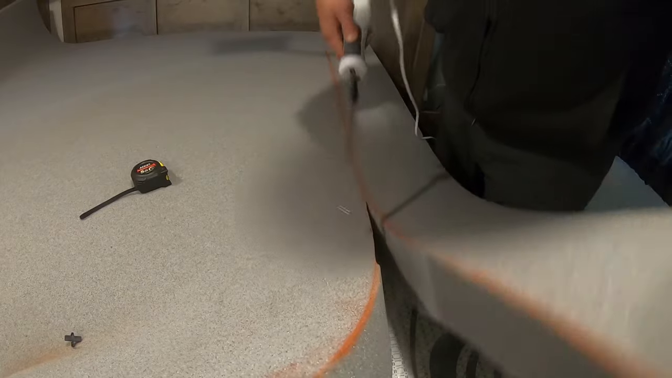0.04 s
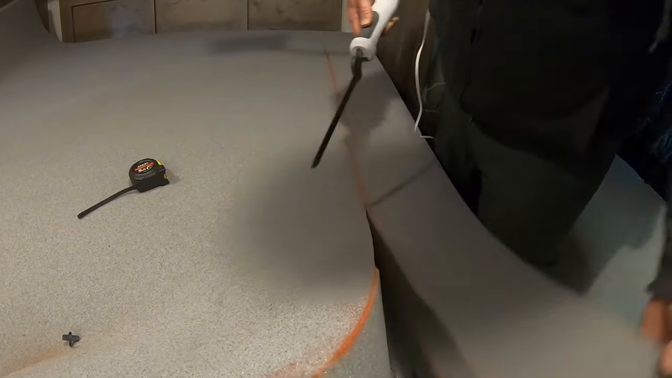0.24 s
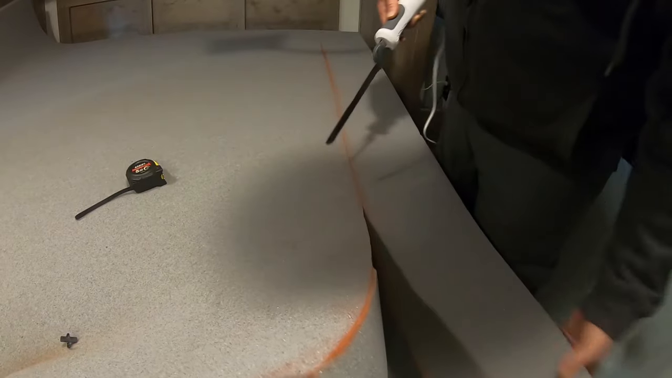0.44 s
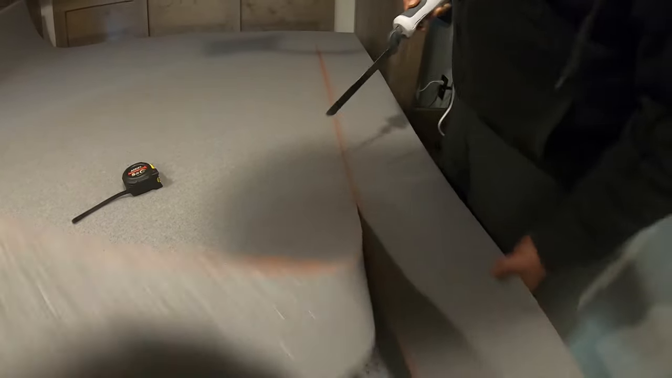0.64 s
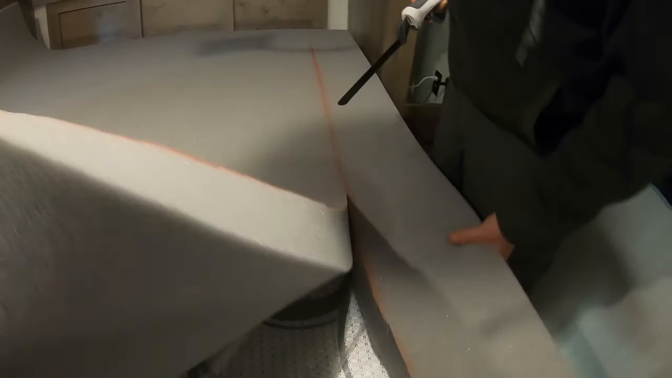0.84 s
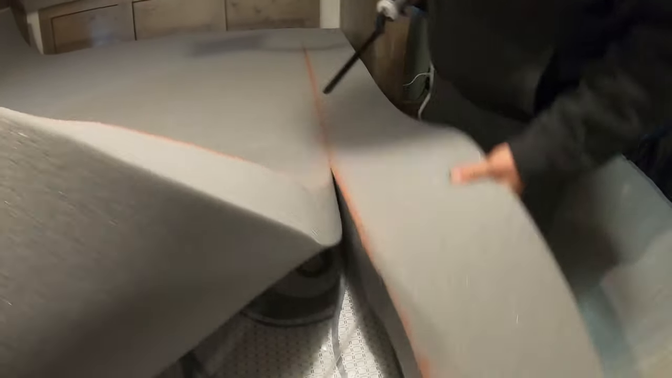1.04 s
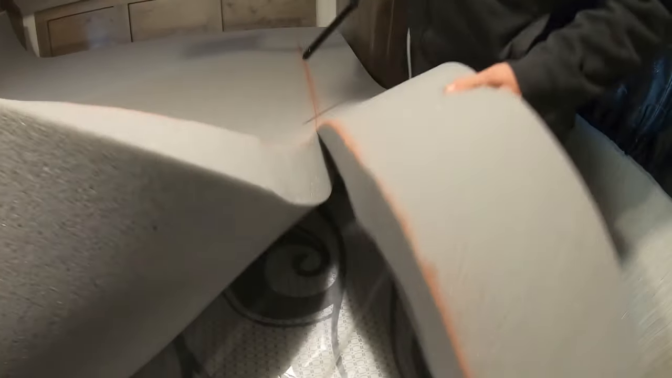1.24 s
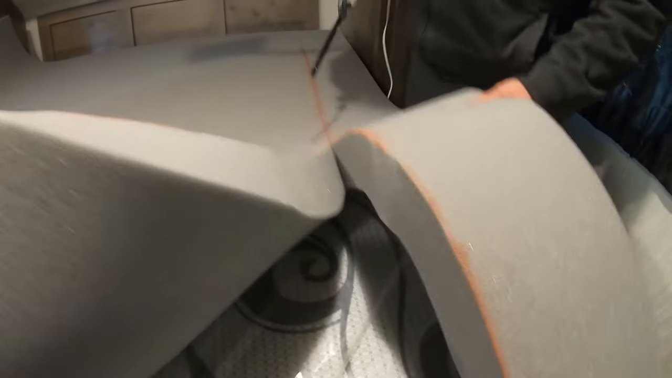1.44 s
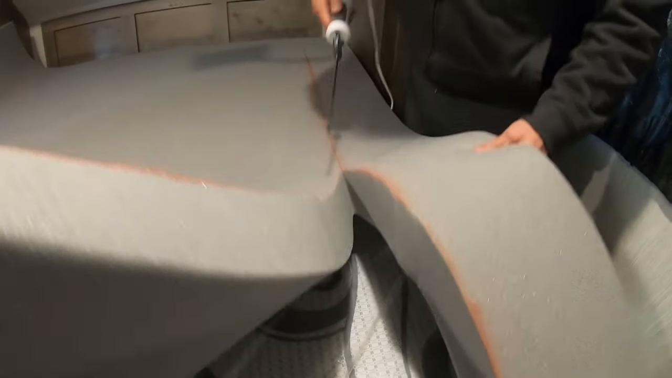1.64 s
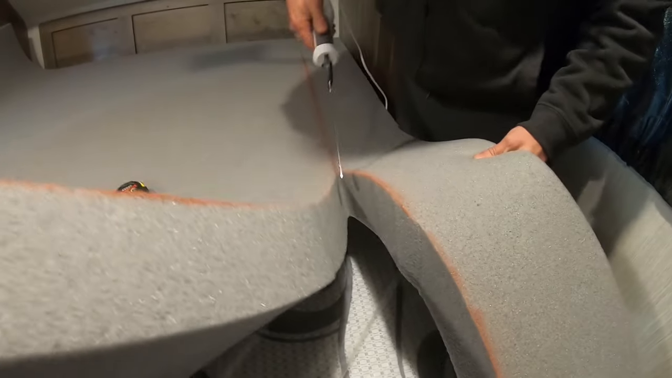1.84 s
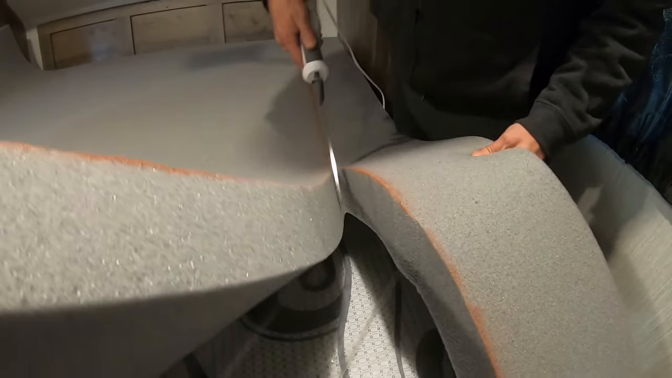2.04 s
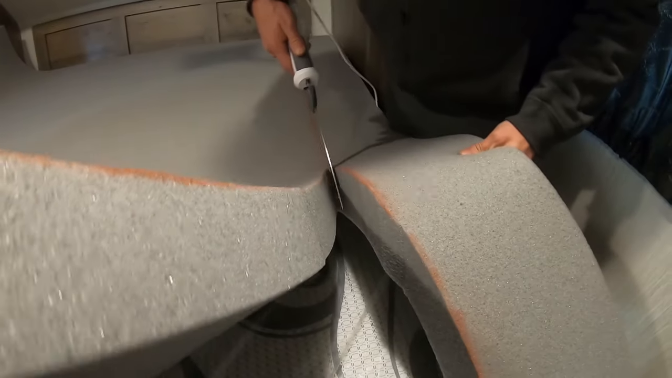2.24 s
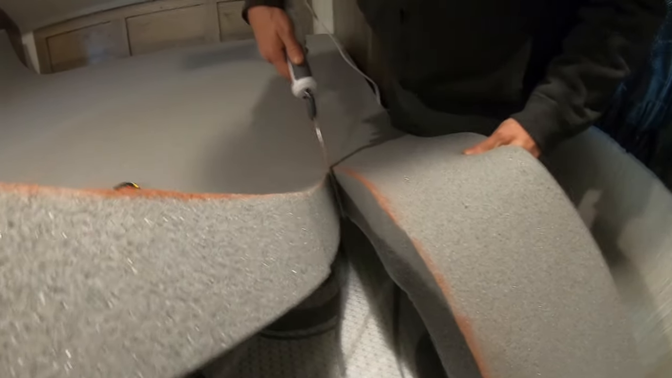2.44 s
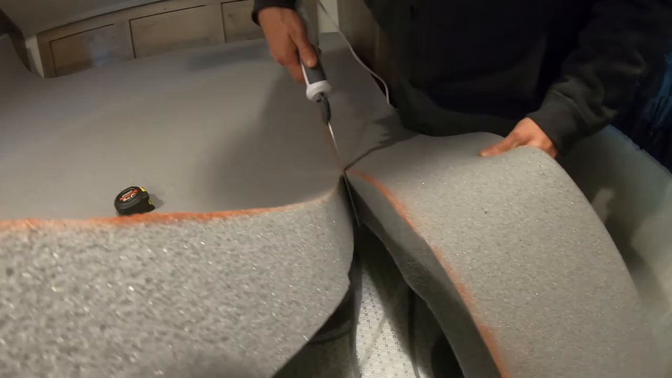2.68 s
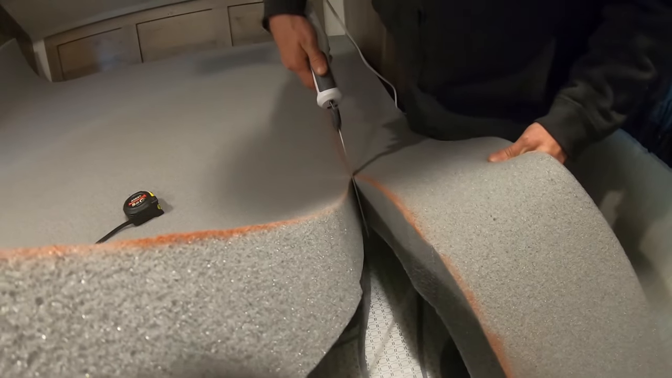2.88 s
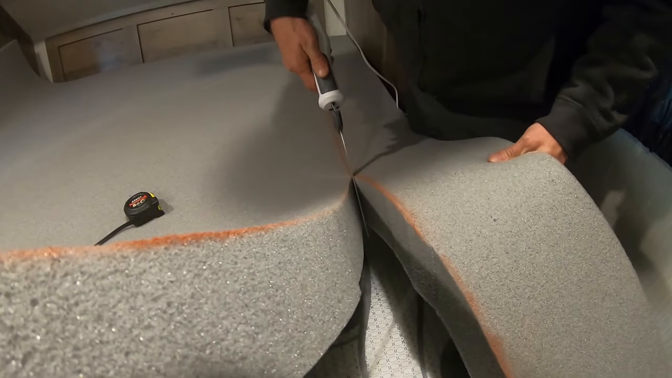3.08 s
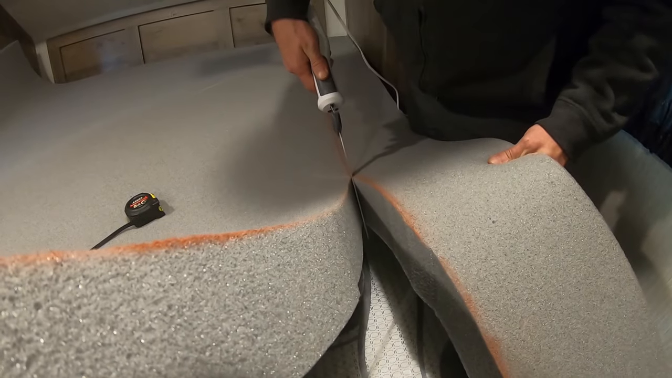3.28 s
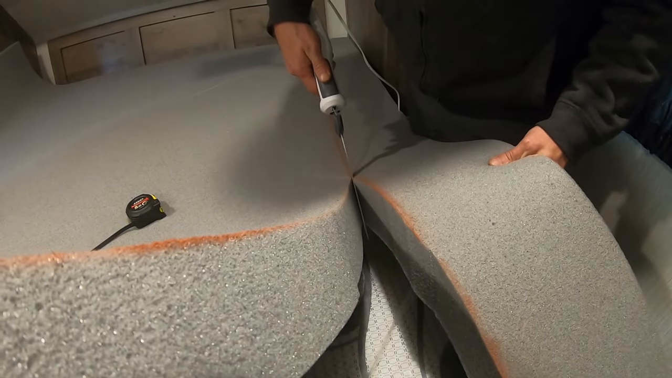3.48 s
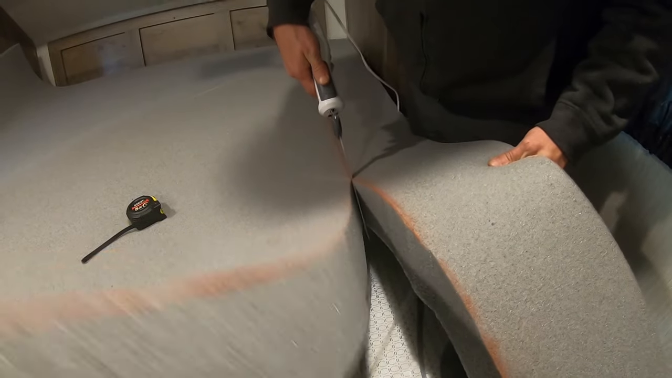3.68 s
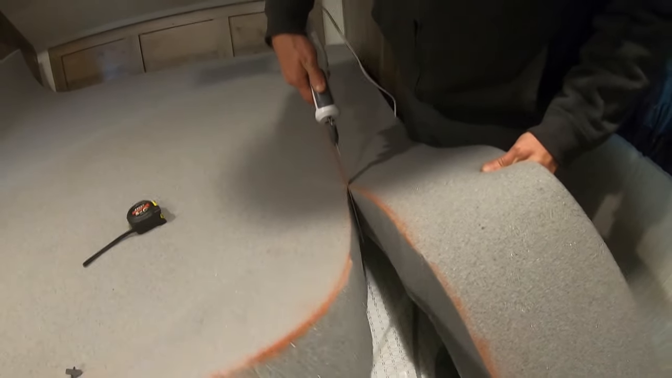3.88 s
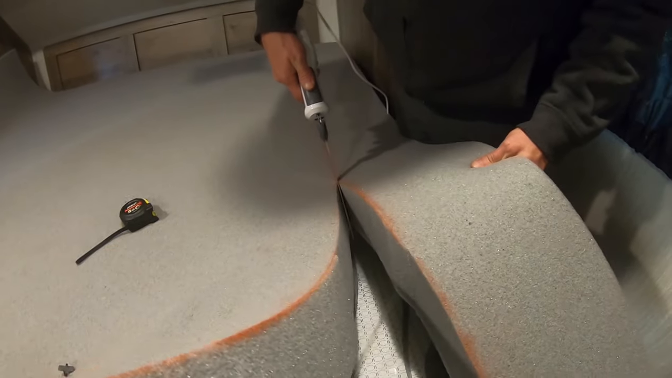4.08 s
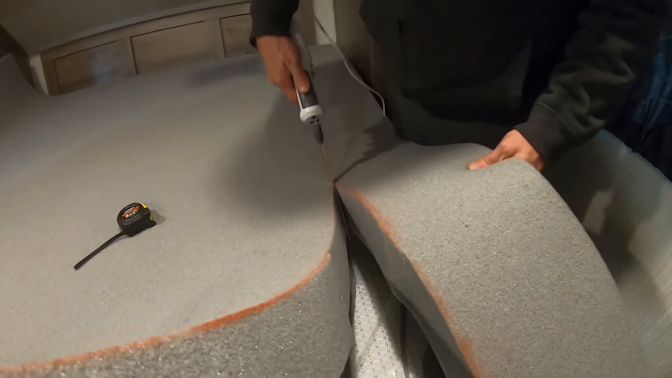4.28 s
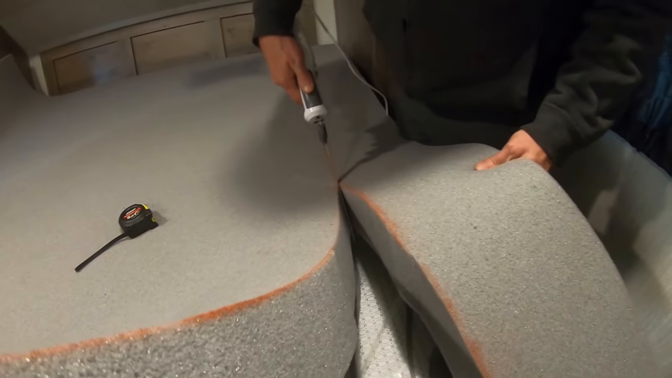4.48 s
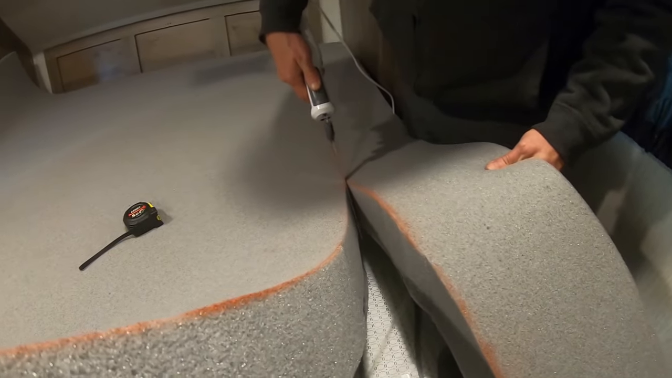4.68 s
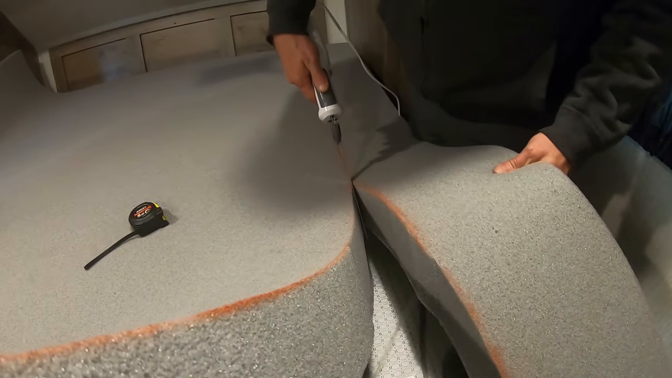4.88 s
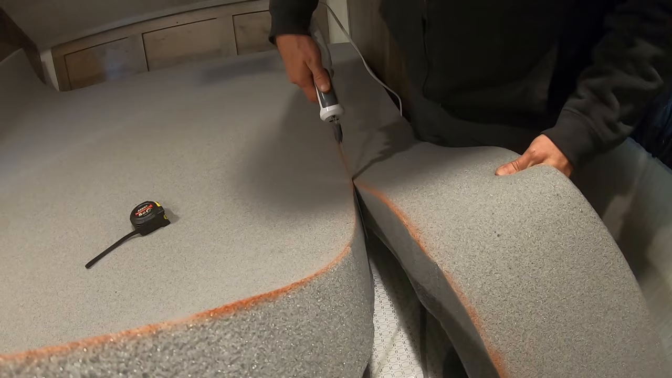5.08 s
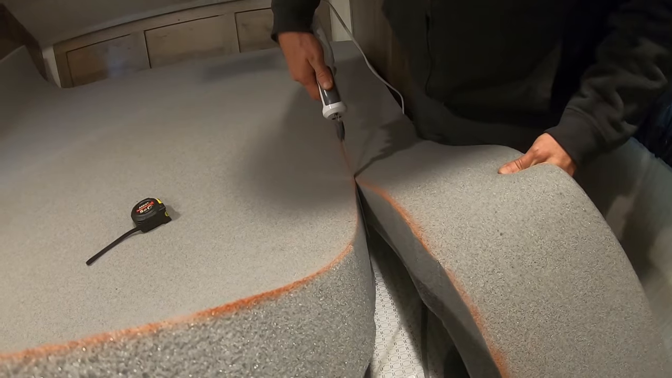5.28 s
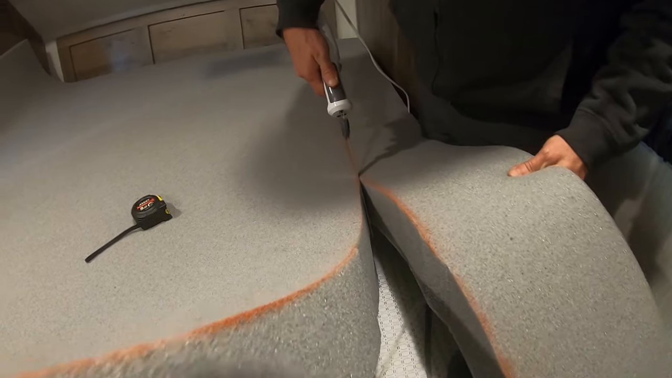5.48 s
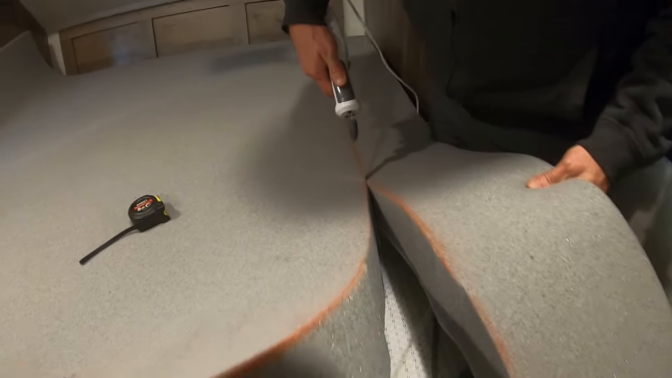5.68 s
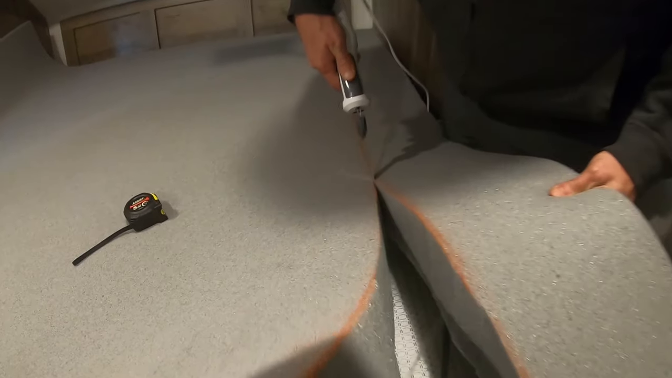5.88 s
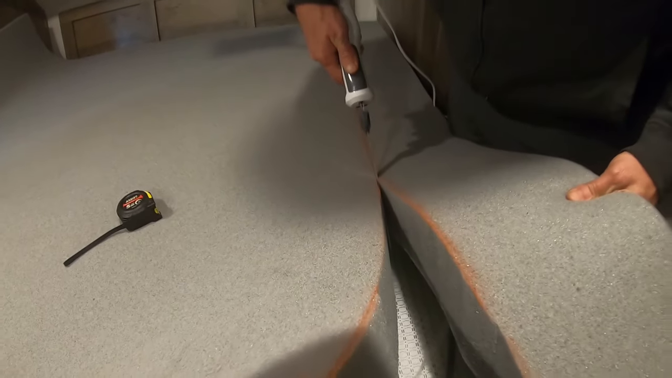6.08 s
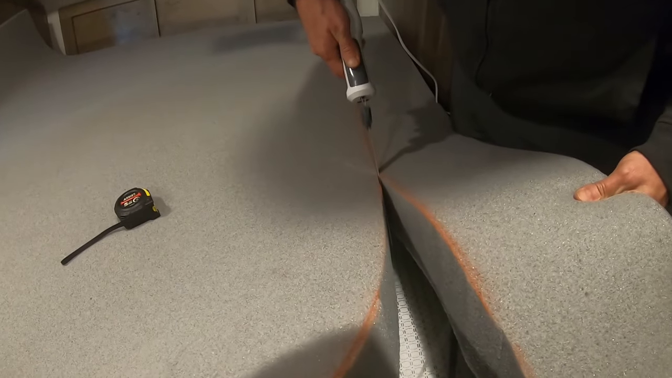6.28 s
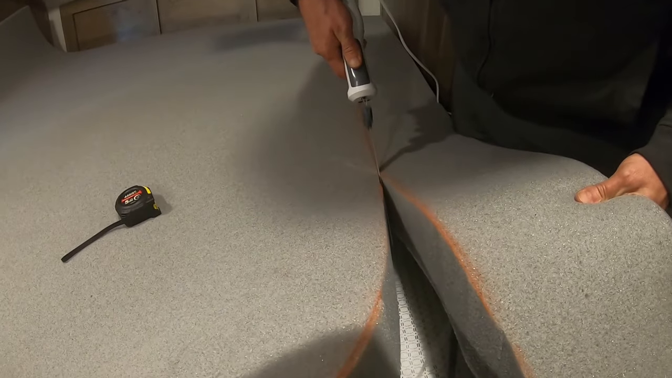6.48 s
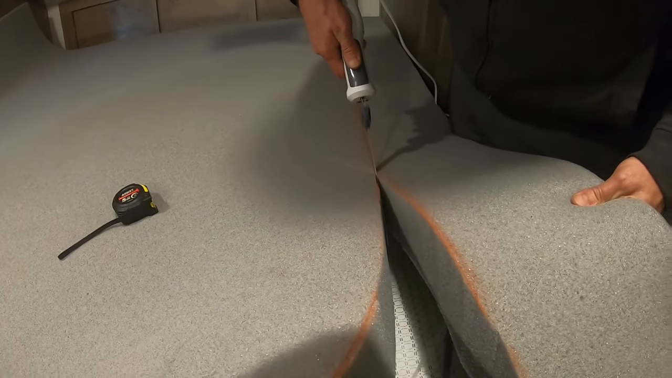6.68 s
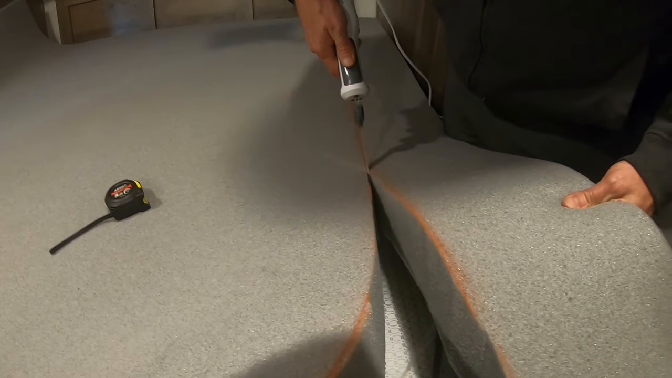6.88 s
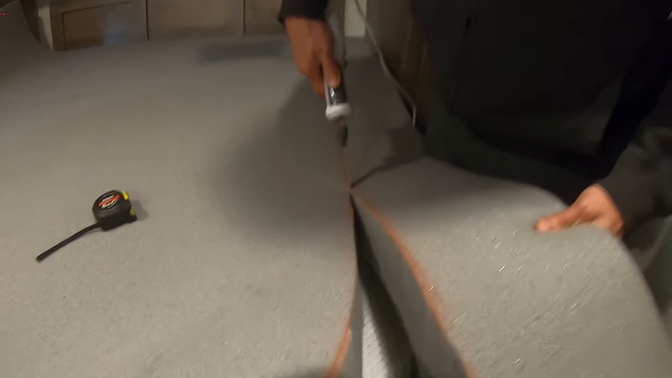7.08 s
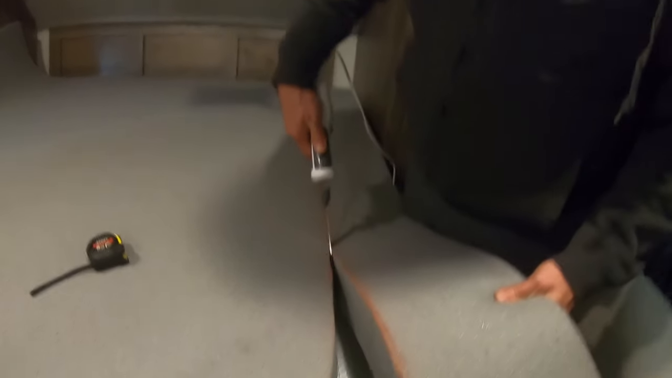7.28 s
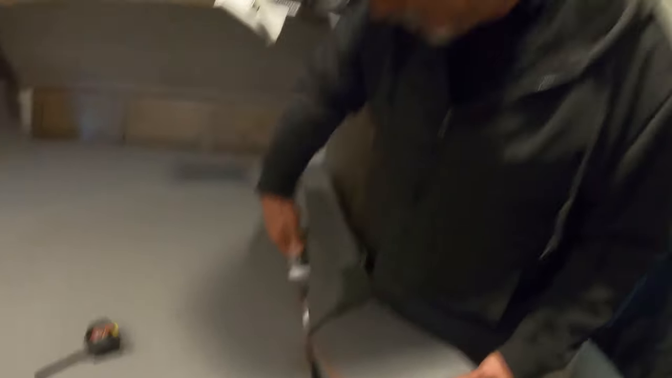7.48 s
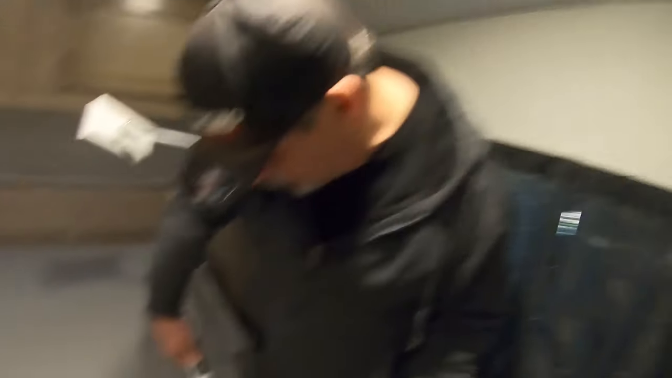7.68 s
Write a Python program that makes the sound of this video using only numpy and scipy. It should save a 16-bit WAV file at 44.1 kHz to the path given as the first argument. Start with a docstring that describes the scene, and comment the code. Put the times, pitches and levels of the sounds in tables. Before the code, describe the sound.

Close in a small, dry trailer, thick foam brushes, catches and slips, with soft hand thuds. Loose knife blades tick lightly as they are set in the cut. A trigger clicks and the electric knife starts almost at once, a loud, gritty, fast-stroking buzz that holds until the end apart from one brief sag. A hand-held phone about a metre away picks up low air bumps.

```python
"""A slab of thick foam is folded back in a small trailer: cells brush in noise scuffs, catch and slip. From 1.2
s the knife's loose blades tick as they are set into the cut: noise cracks with sine rings. At 2.66 s the
trigger clicks and the motor starts: a worm gear drives two blades, 32 strokes a second, as sine lines and
rasping noise. At 6.93 s the trigger slips and the motor sags, then recovers. Thuds of hands and body fall
throughout. A hand-held phone listens from about a metre, swaying slowly in the hand."""
import sys
import numpy as np
from scipy import signal
from scipy.fft import rfft, irfft, next_fast_len
from scipy.io import wavfile

SR = 44100
rng = np.random.default_rng(int(sys.argv[2]) if len(sys.argv) > 2 else 0)


def put_to_file(sound):
    """Save the sound as 16-bit audio at rate SR, in the file named by the first command-line argument."""
    columns = np.atleast_2d(sound).T  # one column per channel
    safe = np.clip(columns, -1, 1)
    whole_steps = np.round(safe * 32767)
    wavfile.write(sys.argv[1], SR, whole_steps.astype(np.int16))


N = 340978
T = np.arange(N) / SR
HZ = np.maximum(np.fft.rfftfreq(2 * next_fast_len(N // 2 + 4096), 1 / SR), 1)


def undb(db):
    """Decibels to gain."""
    return 10 ** (np.asarray(db) / 20)


def curves(table):
    """The columns of a table, joined by lines in time."""
    s, *columns = np.transpose(table)
    return [np.interp(T, s, c) for c in columns]


def slope(points, hz=HZ):
    """A spectrum in dB, joined by lines over log frequency."""
    f, db = np.transpose(points)
    return np.interp(np.log(hz), np.log(f), db)


def tilt(db_per_octave):
    """A treble tilt in dB that starts at 400 Hz; its overall level is left to the caller."""
    return db_per_octave * np.log2(np.maximum(HZ, 400))


def colour(x, db):
    """Causal minimum-phase filter with the given gain at each frequency."""
    cepstrum = irfft(np.log(undb(db)))
    size = len(cepstrum)
    cepstrum[1:size // 2] *= 2
    cepstrum[size // 2 + 1:] = 0
    return irfft(rfft(x, size) * np.exp(rfft(cepstrum)))[:N]


def band(x, lo_hz, hi_hz):
    """The part of a sound between two frequencies."""
    spectrum = rfft(x, 2 * len(HZ) - 2)
    return irfft(spectrum / (1 + (lo_hz / HZ) ** 8) / (1 + (HZ / hi_hz) ** 8))[:N]


def unit(x):
    """Scale to rms 1."""
    return x / np.sqrt(np.mean(x ** 2))


def walk(rate_hz):
    """Random wander from 0.3 Hz up to the rate, with a spread of 1."""
    return unit(band(rng.standard_normal(N), .3, rate_hz))


def grit(spread_db, size=N):
    """Noise made of tiny contacts, 8 samples each, of very unequal strength."""
    strength = np.repeat(rng.standard_normal(size // 8 + 1), 8)[:size]
    return unit(rng.standard_normal(size) * undb(spread_db * strength))


def brighten(x, db):
    """Raise or lower the treble over time."""
    return x + (undb(db) - 1) * band(x, 4300, SR)


def pulse(turn, at, width):
    """A pointed swell once a stroke."""
    return np.exp(-abs((turn - at + .5) % 1 - .5) / width)


def swell(s, length_s):
    """A smooth rise and fall around a moment; the length is its standard deviation."""
    return np.exp(-.5 * ((T - s) / length_s) ** 2)


ROOM_DB = -54
# room air spectrum: (frequency [Hz], relative level [dB])
AIR_COLOUR = [(35, -13), (60, -12), (107, -12.5), (206, -11.5), (359, -15.5), (533, -14.5), (953, -21),
              (7540, -32.5), (15500, -38)]


def room_air():
    """Steady broadband noise of the air in the trailer."""
    return undb(ROOM_DB) * unit(colour(rng.standard_normal(N), slope(AIR_COLOUR)))


SWAY_DB = -33.5
# phone lurching in the hand: (time [s], level [dB], length [s])
PHONE_LURCHES = [(2.535, -22, 0.25), (3.928, -13, 0.12), (5.9, -33.5, 0.9), (7.018, -22.5, 0.13),
                 (7.472, -17, .09)]


def sway():
    """The slow sway of the phone in the hand, stronger whenever it lurches."""
    push_db = slope([(1, -13.0), (3, -4.5), (7, -3), (20, -22.5), (40, -41), (100, -51), (400, -110)])
    push = unit(colour(rng.standard_normal(N), push_db))
    lurch_power = sum((undb(db) * swell(s, length_s)) ** 2 for s, db, length_s in PHONE_LURCHES)
    return push * np.sqrt(undb(SWAY_DB) ** 2 + lurch_power)


def trailer(x, t60_s=.1, wet_db=-13):
    """Close walls answer quickly and the foam soaks the echoes up; only those above 1900 Hz are added."""
    age = T[:SR // 5]
    echoes = rng.standard_normal(len(age)) * np.exp(-np.log(1000) * age / t60_s) * (age > .003)
    wet = signal.fftconvolve(x, echoes / np.linalg.norm(echoes))[:N]
    return x + undb(wet_db) * band(wet, 1900, SR)


# hands and body on the slab: (time [s], level [dB], pitch [Hz], length [s])
SLAB_BUMPS = [(.64, -51, 140, .015), (1.48, -48, 120, .03), (2.207, -44, 310, .004), (2.54, -47, 140, .045),
              (3.61, -40, 65, .025), (7.48, -40, 130, .04), (7.707, -23, 135, .007)]


def bumps():
    """Soft hands and body thud through the slab as short swells of low noise."""
    noise = rng.standard_normal(N)
    out = np.zeros(N)
    for s, db, hz, length_s in SLAB_BUMPS:
        out += undb(db) * unit(band(noise, hz / 1.5, hz * 1.5)) * swell(s, length_s)
    return out


# foam spectrum: (frequency [Hz], relative level [dB])
CELL_COLOUR = [(47, 4.5), (80, -2.5), (230, -7), (335, -2), (418, -1.5), (466, -2), (1530, -4), (1710, -4),
               (9130, -20.5), (15500, -34)]
# foam and sleeves brushing the slab: (time of middle [s], level [dB], length [s], relative hiss [dB])
FOAM_BRUSHES = [(0, -43, 0.038, -0.5), (.2, -58, 0.054, -5), (0.345, -41, 0.05, -5), (.5, -46.5, 0.11, 4.5),
                (0.695, -46.5, 0.048, 3), (.87, -50.5, 0.052, 1), (1.008, -53.5, 0.13, 8.5),
                (1.302, -50.5, .06, 0), (1.47, -44, 0.067, -1), (1.69, -48.5, 0.11, -0.5)]
# foam catching and slipping: (time [s], level [dB], length [s], treble tilt [dB/octave])
FOAM_SLIPS = [(.042, -48, 0.0023, 3), (.163, -41.5, 0.0024, -2), (0.199, -44, 0.0035, -6.5),
              (0.26, -43, .0025, -4), (0.342, -36.5, .0046, -1), (.367, -37, 0.0017, 0),
              (0.414, -38, .002, 0.5), (0.429, -40, 0.0086, 0), (1.061, -49, 0.01, -2.5),
              (1.387, -55.5, 0.0043, 6), (1.453, -41, 0.0062, 6.5), (1.483, -41, .0078, -6.5)]


def foam():
    """Foam cells brush over each other and over cloth in small scuffs, catching and slipping now and then."""
    cells = grit(4.3)
    rubbing = unit(colour(cells, slope(CELL_COLOUR)))
    dull = band(rubbing, 0.91, 3900)
    scuffs = unit(undb(2.0 * walk(105)))
    body_power, hiss_power = np.zeros(N), np.zeros(N)
    for s, db, length_s, hiss_db in FOAM_BRUSHES:
        brush = swell(s, length_s)
        body_power += (undb(db) * brush) ** 2
        hiss_power += (undb(db + hiss_db) * brush) ** 2
    out = dull * scuffs * np.sqrt(body_power) + (rubbing - dull) * np.sqrt(hiss_power)
    for s, db, length_s, tilt_db in FOAM_SLIPS:
        slip = unit(colour(cells, slope(CELL_COLOUR) + tilt(tilt_db)))
        out += undb(db) * slip * swell(s, length_s)
    return out


# crack spectrum: (frequency [Hz], relative level [dB])
CRACK_COLOUR = [(200, 1), (900, 3), (2000, 7), (5000, -4.5), (8500, -10), (10000, -22), (16000, -20)]
# loose blades ticking; the last row is the click of the trigger:
# (time [s], attack level [dB], ring [Hz], t60 [s], ring re crack [dB], treble tilt [dB/octave])
BLADE_AND_TRIGGER_TICKS = [(1.235, -40, 1290, .025, -4, -1), (1.852, -41.5, 1340, .02, -4, -1),
                           (1.932, -32, 1160, .013, -8, 0), (1.971, -35, 2000, .036, 0, 0),
                           (2.128, -43, 1100, .018, -4, 0), (2.165, -41, 2350, .018, -5, 2),
                           (2.291, -40.5, 1130, .018, -6, 2.5), (2.388, -43.5, 1730, .016, -4, 1.5),
                           (2.430, -43, 1060, .016, -4, 1), (2.663, -38, 1500, .04, -4, 0)]


def ticks():
    """Loose steel taps in its socket, then the trigger clicks: each a crack and a short ring."""
    out, noise = np.zeros(N), rng.standard_normal(N)
    age = T[:SR // 4]
    for s, db, hz, t60_s, ring_db, tilt_db in BLADE_AND_TRIGGER_TICKS:
        span = slice(int(s * SR), int(s * SR) + len(age))
        crack = colour(noise, slope(CRACK_COLOUR) + tilt(tilt_db))[span]
        fade = np.exp(-np.log(1000) * age / t60_s)
        tap = (unit(crack) + undb(ring_db) * np.sin(2 * np.pi * hz * age)) * fade
        out[span] += undb(db) * tap * np.linalg.norm(fade) / np.linalg.norm(tap)
    return out


MOTOR_ON_S, SPIN_UP_S = 2.66, .0331  # start, time constant
SLIP_FROM_S, SLIP_TO_S = 6.9325, 7.078
SAG_SHARE, SAG_LAG_S = .222, .0468  # limit of the speed loss, time constant of sinking and recovery


def revs():
    """Share of full speed: the motor spins up, and sags while the trigger slips."""
    spin_up = 1 - np.exp(-np.maximum(T - MOTOR_ON_S, 0) / SPIN_UP_S)
    sink = 1 - np.exp(-(np.clip(T, SLIP_FROM_S, SLIP_TO_S) - SLIP_FROM_S) / SAG_LAG_S)
    recover = np.exp(-np.maximum(T - SLIP_TO_S, 0) / SAG_LAG_S)
    return spin_up * (1 - SAG_SHARE * sink * recover)


# full motor speed, shifting a little with foam drag: (time [s], rate [strokes/s])
FULL_STROKE_RATE = [(2.9, 32.217), (3.5, 32.482), (4.9, 32.231), (6.5, 32.035), (6.85, 31.882),
                    (7.4, 32.159)]


def speed():
    """Strokes per second."""
    return curves(FULL_STROKE_RATE)[0] * revs()


def slack():
    """Looseness of the gear teeth: 0 at full speed, 1 once the speed is at least 16 % short."""
    return np.clip((1 - revs()) / .16, 0, 1)


HUM_DB, GROWL_DB, BUZZ_DB = -37, -34.5, -30  # low, middle, high gear lines at full speed, before CUT_COURSE
HANDLE_POWER = 4.4  # gain grows as this power of the speed
# strong gear lines: (multiple of stroke rate, relative level [dB])
STRONG_LINES = [(1, -2), (5, -10.5), (7, -5), (8, -10.5), (9, -8), (10, 0.5), (11, -10.5), (18, -3.5),
                (20, 1), (21, 0), (22, 1.5), (23, 0.5), (24, 2.5), (27, -2), (28, -3.5), (30, -3),
                (32, -1.5), (37, 0), (39, 0), (40, 6.5), (44, -18), (45, 4), (46, -2), (47, 0), (49, -22)]
# all other gear lines: (frequency [Hz], relative level [dB])
WEAK_LINES = [(60, -15), (200, -12), (500, -15), (800, -11.5), (1600, -4)]
# blade bending resonance, shifting with depth of cut: (time [s], frequency [Hz], lift [dB])
BLADE_BEND = [(2.7, 1450, 3), (3.4, 1460, -2), (3.9, 1410, 7), (5.0, 1430, 8), (5.5, 1470, 2),
              (5.8, 1300, -5), (6.8, 1120, 13), (7.11, 1370, 14), (7.35, 1350, 1), (7.7, 1280, 3)]
# jolt of the low, middle, high lines: (place in stroke [turn 0-1], timing scatter [rad])
LINE_JOLTS = [(.55, .8), (.965, 1.05), (.99, 1.6)]
# blade play, also for blades(): (time [s], push-end knock [dB], way-back clack [dB]), before weighting
BLADE_PLAY = [(2.75, 5.5, 9.5), (3, 5.5, 8), (3.25, 9.5, 10.5), (3.55, 10, 3), (3.8, 8.5, 6), (4.2, 6.5, 0),
              (4.8, 6.5, 4.5), (5.3, 6.5, 7), (5.9, 5.5, 4.5), (6.45, 6.5, 9.5), (6.95, 8, 2), (7.3, 8, 0)]
# course of the cut, also for blades():
# (time [s], rasp level [dB], relative treble [dB], extra hum and buzz [dB], extra growl [dB])
CUT_COURSE = [(2.8, -25.5, -0.5, -0.5, -5), (3.13, -25, -.5, 1, 1), (3.3, -27, 1.5, .5, 0.5),
              (4.08, -26.5, 0.8, 0.5, 0), (4.22, -25, -1, 0.5, -1.5), (5.1, -27, 0.9, 0, 0),
              (5.95, -25, 0, 1.3, 1), (6.85, -25, .3, 2.1, 2.3), (7.3, -26.5, .5, 2, 1),
              (7.7, -29.5, 3, -1, 2.5)]


def gears(turn):
    """The gear's uneven teeth meet alike every turn: the handle thumps on the return, growls at the knock."""
    stroke_hz = speed()
    bend_hz, bend_db = curves(BLADE_BEND)
    strong = {int(round(k)): db for k, db in STRONG_LINES}
    # slack teeth rattle and break the lines up
    rattle = .017 * slack() * walk(60)
    sound, power = np.zeros((3, N)), np.zeros((3, N))
    for k in range(1, 52):
        db = strong.get(k, slope(WEAK_LINES, k * stroke_hz[-1]))
        part = int(k > 16) + int(k > 31)
        at, scatter = LINE_JOLTS[part]
        # each line swells and lags a little as the grip and the foam shift
        grip_db = 1.5 * np.interp(T, np.linspace(0, T[-1], 20), rng.standard_normal(20))
        lag = scatter * np.interp(T, np.linspace(0, T[-1], 8), rng.standard_normal(8))
        resonance_db = bend_db / (1 + ((k * stroke_hz - bend_hz) / 55) ** 2)
        gain = undb(db + grip_db + resonance_db)
        sound[part] += gain * np.sin(2 * np.pi * k * (turn - at + rattle) + lag)
        power[part] += gain ** 2 / 2
    hum, growl, buzz = sound / np.sqrt(power)
    # the high lines swell with every knock
    buzz = buzz * undb(0.42 * curves(BLADE_PLAY)[0] * (pulse(turn, 0, 0.14) - 1.23))
    _, _, hum_db, growl_db = curves(CUT_COURSE)
    upper = growl * undb(GROWL_DB + growl_db) + buzz * undb(BUZZ_DB + hum_db)
    handle = hum * undb(HUM_DB + hum_db) + upper * undb(0.58 * walk(19))
    return handle * revs() ** HANDLE_POWER


RASP_POWER = 1.38  # gain grows as this power of the speed
# rub of the blades through one stroke: (turn [0-1], level [dB])
STROKE_RUB = [(0, 1), (.12, 2.5), (.25, 4), (.34, -2), (.43, 4.5), (.5, 5.5), (.6, 2.5), (.69, 2),
              (.77, -2), (.87, 3.5), (.94, 2.5), (1, 2)]
# steel sliding on steel: (frequency [Hz], relative level [dB])
STEEL_COLOUR = [(60, -37), (250, -6.5), (500, -9), (700, -2), (1100, -4.5), (1700, -1.5), (2900, 1),
                (3600, -4.5), (6000, -10), (8700, -10), (9400, -17.5), (13800, -15.5), (14400, -21),
                (16000, -24)]
# blade and casing resonances: (frequency [Hz], width [Hz], lift [dB])
CASING_MODES = [(700, 41, 4), (1508, 59, 9), (1952, 380, 5), (2500, 74, 5.5), (3137, 47, 3.5),
                (4130, 370, 2.5), (5400, 150, 3), (7780, 190, -3.5), (9970, 200, 7.5)]
# thin high blade ring: (time [s], frequency [Hz], level re rasp [dB])
BLADE_RING = [(2.7, 8480, -20), (3.3, 8050, -22), (4.3, 8280, -14.5), (5.0, 8640, -16), (5.7, 8800, -17),
              (6.9, 8630, -26), (7.7, 8900, -29)]
# motor whine: (multiple of stroke rate, level re rasp [dB])
MOTOR_WHINE = [(60, -18), (80, -13), (240, -23), (312, -27.5), (360, -23)]


def blades(turn, size=1370):
    """Two blades rasp along each other and knock where they reverse; part of the scrape repeats every stroke."""
    rasp_db, hiss_db, _, _ = curves(CUT_COURSE)
    knock_db, clack_db = curves(BLADE_PLAY)
    stroke = (turn + .5).astype(int)
    chance = rng.standard_normal((stroke.max() + 1, 3))[stroke].T
    rub_db = np.interp(turn % 1, *np.transpose(STROKE_RUB))
    # each knock is a bright snap inside a longer, duller clatter
    snap_db = (1.6 * knock_db + chance[0]) * pulse(turn, .004 * chance[1], .04)
    snap_db += (1.7 * clack_db + 1.5 * chance[2]) * pulse(turn, .39, .024)
    clatter_db = (.8 * knock_db + slack()) * pulse(turn, -.015, .075) + .25 * snap_db
    # the scratches in the steel come round again, and change slowly as the blades bend
    bend = 1.32 * walk(0.6)
    scratches = np.zeros(N)
    for share in (np.cos(bend), np.sin(bend)):
        scratches += np.interp(turn % 1, np.arange(size) / size, grit(5.6, size=size)) * share
    scrape = 0.63 * band(scratches, 1740, 3030) + 0.93 * grit(2.1)
    dull = band(scrape, 1, 3300)
    fizz = band(scrape, 9300, SR)
    force = dull * undb(rub_db + clatter_db)
    force += 1.21 * (scrape - dull - fizz) * undb(rub_db + snap_db)
    # the finest fizz comes from sliding and follows the knocks slightly less
    force += 1.07 * fizz * undb(rub_db + 0.98 * snap_db)
    casing_db = slope(STEEL_COLOUR)
    for hz, width_hz, db in CASING_MODES:
        casing_db = casing_db + db / (1 + (2 * (HZ - hz) / width_hz) ** 2)
    rasp = brighten(unit(colour(force * (T > MOTOR_ON_S), casing_db)), hiss_db)
    ring_hz, ring_db = curves(BLADE_RING)
    ring_tone = walk(260) * np.sin(2 * np.pi * np.cumsum(ring_hz) / SR)
    ring = ring_tone * undb(ring_db + rub_db + .5 * snap_db)
    # the rotor's small flutter blurs its high lines most
    flutter = .0003 * walk(40)
    whine = np.zeros(N)
    for k, db in MOTOR_WHINE:
        whine += undb(db + 1.8 * walk(5.7)) * np.sin(2 * np.pi * round(k) * (turn + flutter))
    return ((rasp + ring) * revs() ** RASP_POWER + whine * revs()) * undb(rasp_db)


START_TURN = .576


def knife():
    """The motor's speed sets the stroke; it wavers slightly with the drag of the foam."""
    turn = START_TURN + np.cumsum(speed()) / SR + 0.0022 * walk(7.7)
    return gears(turn) + blades(turn)


CHANNEL_HISS_DB = -72
# faint side signal, re mid: (frequency [Hz], level [dB])
SIDE_COLOUR = [(30, -41), (250, -37.5), (1200, -68), (3000, -116), (6000, -102), (14000, -50)]


def scene():
    """The sound is nearly mono, with a faint side and separate faint hiss in each channel."""
    mid = trailer(knife() + foam() + ticks()) + bumps() + room_air()
    # quarter-turn phase shift
    side = np.imag(signal.hilbert(colour(mid, slope(SIDE_COLOUR)), next_fast_len(N)))[:N]
    hiss = undb(CHANNEL_HISS_DB) * rng.standard_normal((2, N))
    return np.array([mid + side, mid - side]) + sway() + hiss


TOP_HZ = 15780


def record(dry):
    """The phone rounds the loudest peaks and cuts the top."""
    rounded = .7 * np.tanh(dry / .7)
    return signal.sosfilt(signal.ellip(12, .2, 80, TOP_HZ, fs=SR, output="sos"), rounded)


dry = scene()
out = record(dry)
put_to_file(out)
```